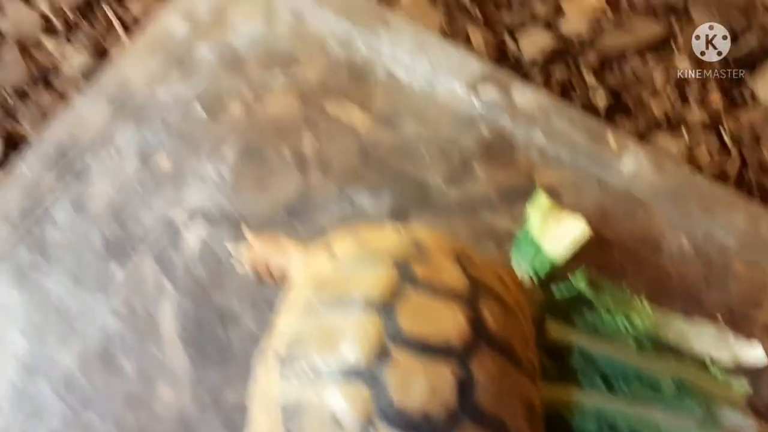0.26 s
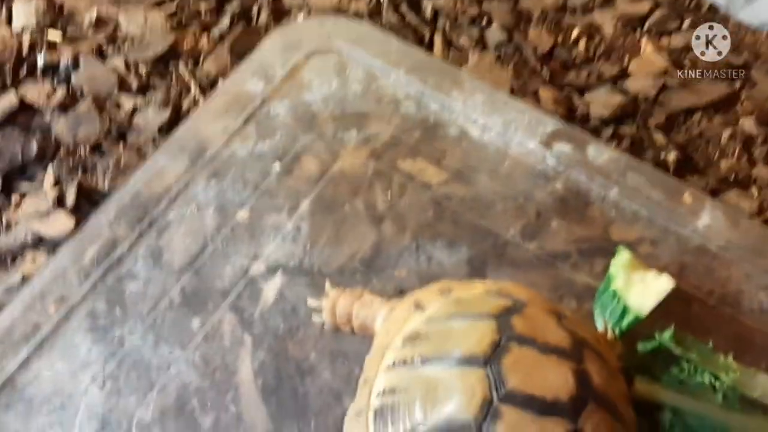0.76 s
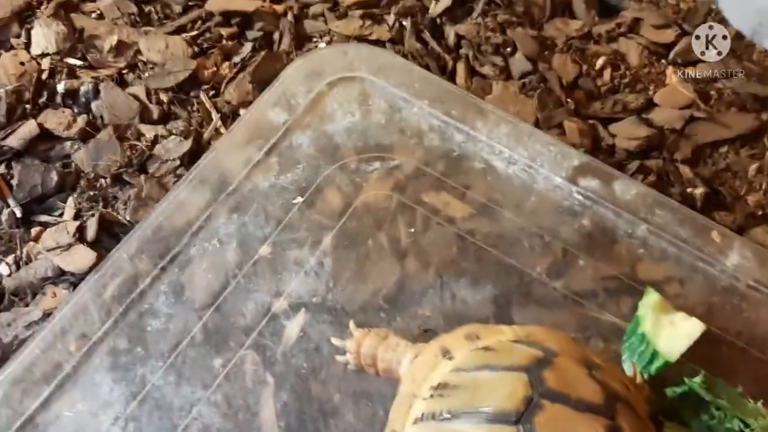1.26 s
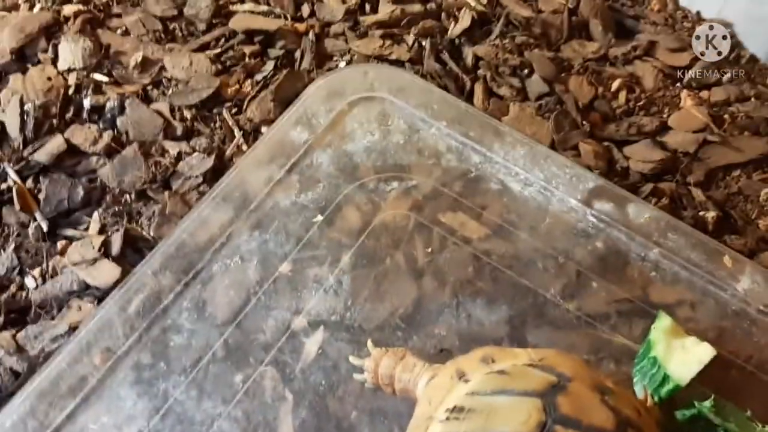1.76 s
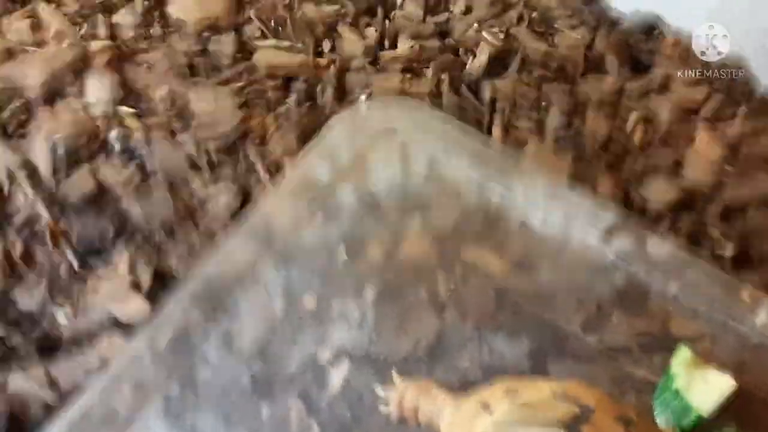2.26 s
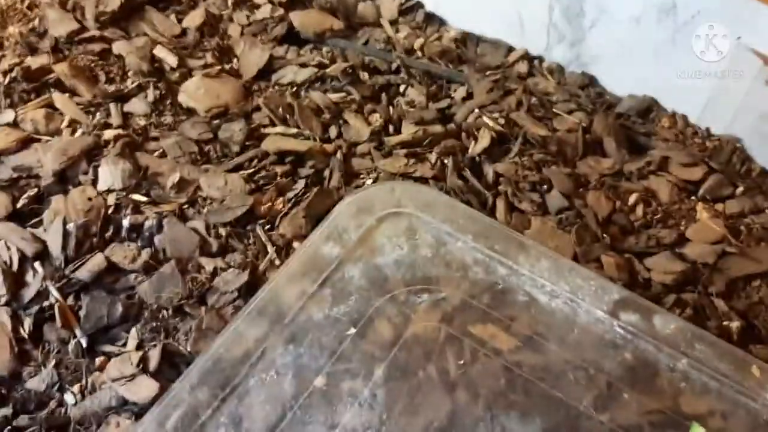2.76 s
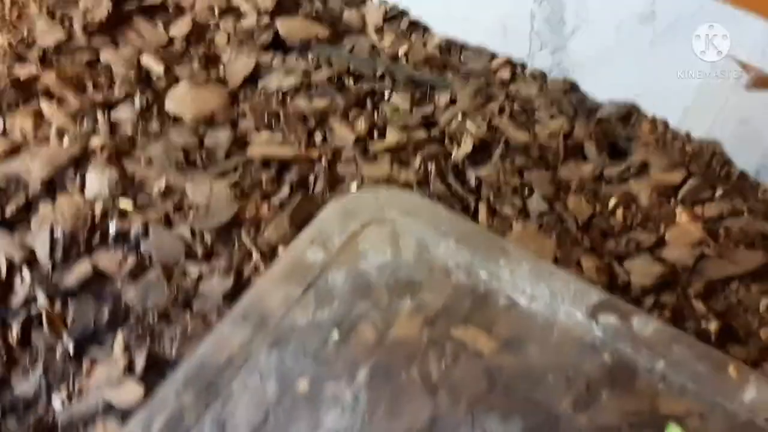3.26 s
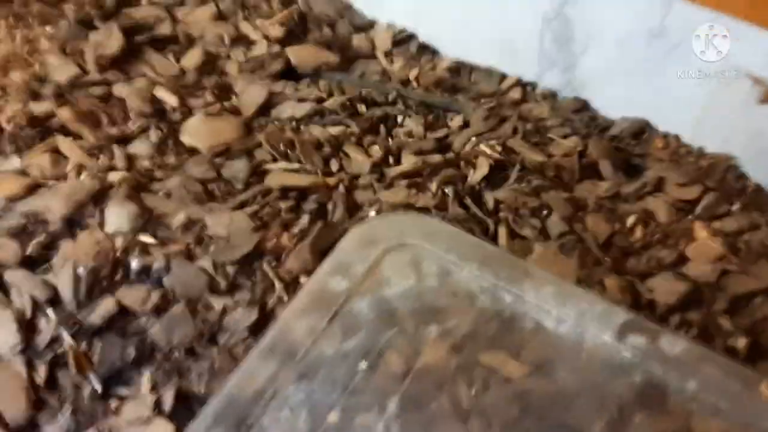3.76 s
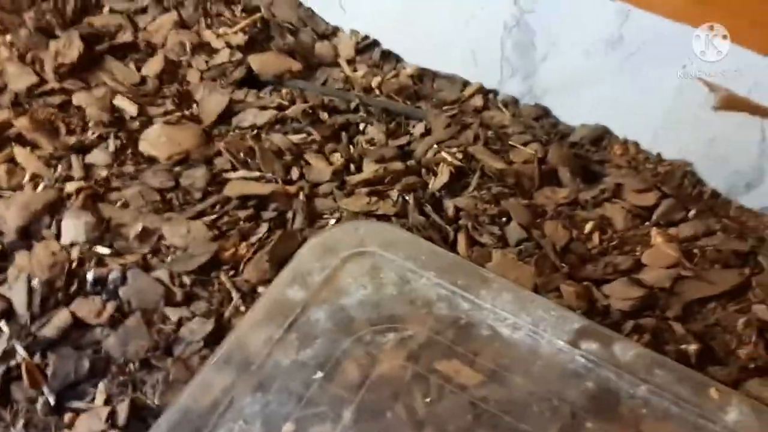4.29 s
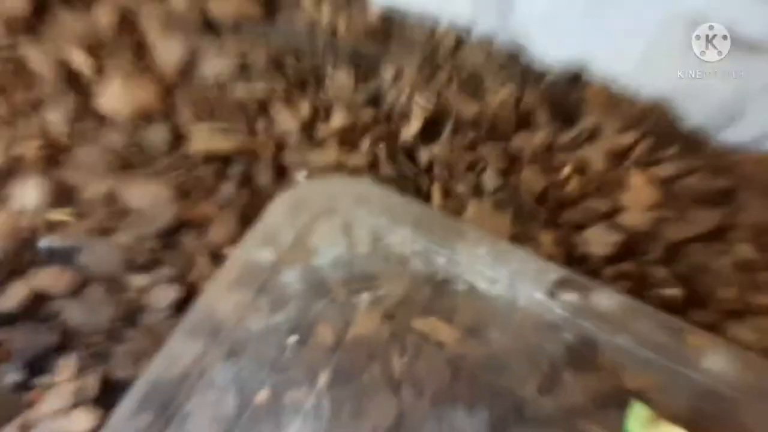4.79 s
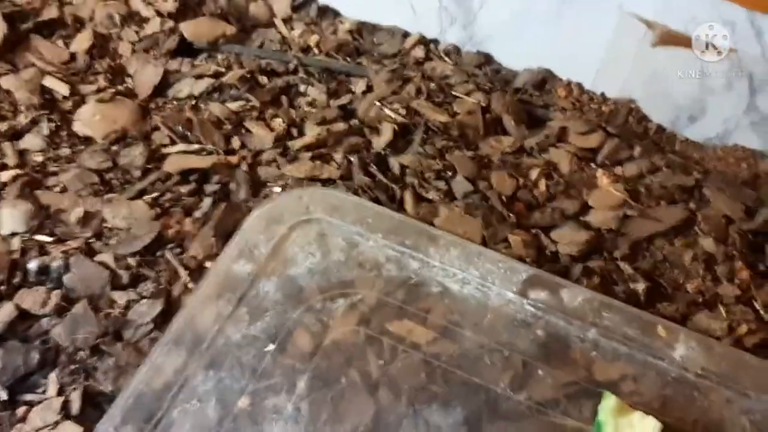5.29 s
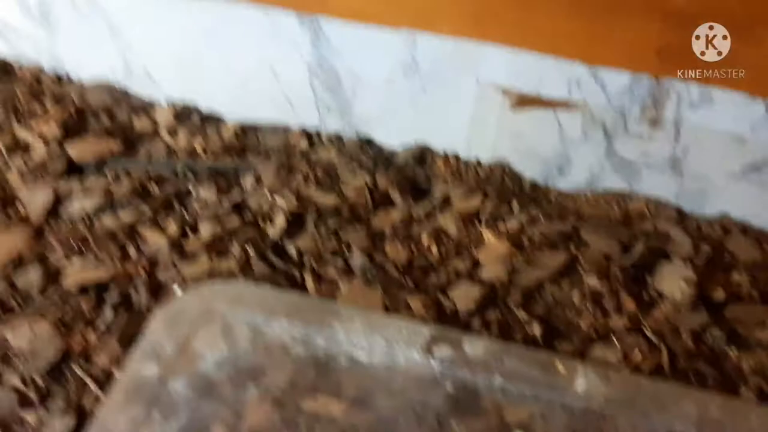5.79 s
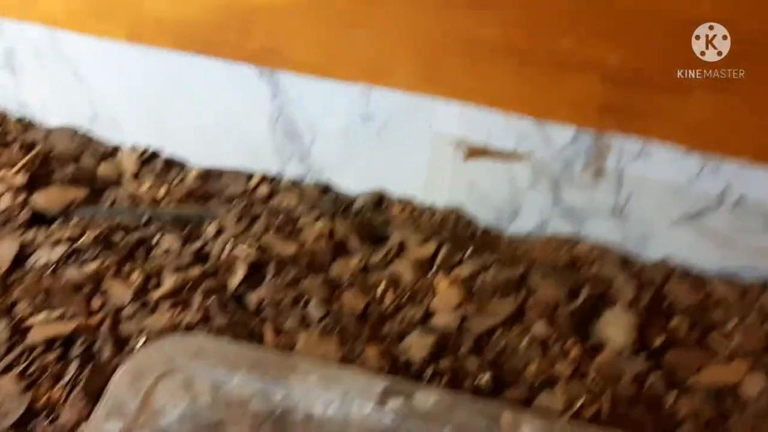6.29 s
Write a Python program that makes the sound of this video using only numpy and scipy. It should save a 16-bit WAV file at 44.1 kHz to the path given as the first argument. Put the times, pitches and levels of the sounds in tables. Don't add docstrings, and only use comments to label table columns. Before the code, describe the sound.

At 0.06 s a heavy, muffled bump bounces and rings low in plastic, with a thin drag and a far engine's low throb. The engine drops back at once, rises slightly around 0.9 s, slows, swells near 1.9 s and dies just after 2 s. Faint foot scuffs come at 0.9 and 1.2 s. At 1.47 s shell cracks on the hard tray with a quick bounce and a deep jolt of the held microphone. Small taps and dry scuffs follow from 2 to 3.6 s. Brighter double cracks snap at 3.85 s, light claw clicks at 4.13, the sharpest crack at 4.85, a duller, woodier one at 5.25. A short stuttering scrape runs 5.6-5.8 s, then faint taps and hiss to 6.5 s. Throughout: wavering low motor hum, soft floor thuds, quiet ventilation, a barely audible fan whine and short, close pen echoes.

```python
import sys
import numpy as np
from scipy import signal
from scipy.io import wavfile
from scipy.ndimage import uniform_filter1d

SR = 44100
rng = np.random.default_rng(int(sys.argv[2]) if len(sys.argv) > 2 else 0)


def volts_from_decibels(level):
    exponent = np.asarray(level, float) / 20
    return 10 ** exponent


def waveform_to_disk(signal):
    frames = np.transpose(np.atleast_2d(signal))
    scaled = np.clip(frames, -1, 1) * 32767
    samples = np.round(scaled).astype(np.int16)
    wavfile.write(sys.argv[1], SR, samples)


N = 288414

# t/s, tick/dB, thud/dB, knock/dB, fizz/dB
SHELL_CRACKS = [
    (1.468, -25, -27.5, -24.5, -16),
    (1.474, -26.5, -49, -36, -17),
    (1.505, -38, -47.5, -40.5, -44.5),
    (3.845, -17, -25.5, -24.5, -13),
    (3.856, -19, -26.5, -16, -18.5),
    (4.853, -14, -27.5, -20.5, -15.5),
    (4.861, -17.5, -30.5, -24.5, -14),
    (5.2476, -20.5, -34.5, -17, -32.5),
    (5.255, -28.5, -33, -20.5, -30.5),
]
# t/s, tick/dB, thud/dB, fizz over tick/dB, thud f/Hz
CLAW_TAPS = [(1.44, -60.5, -36.5, 9.5, 249), (1.619, -75.5, -90, 16, 440), (2.079, -54.5, -43.5, 0.1, 340),
             (2.347, -63.5, -48, 0, 350), (2.598, -78, -42, -3, 401), (2.61, -49.5, -36.5, 7, 358),
             (2.907, -61.5, -47, -0.5, 400), (3.755, -67, -58, 5, 420), (3.793, -71, -45.5, -18, 380),
             (4.123, -39.5, -41, -5, 320), (4.131, -38, -46, -5.5, 380), (5.218, -63.5, -73, -2.4, 400),
             (5.678, -53, -42.5, 4, 350), (5.819, -52.5, -43.5, -21.5, 410), (6.09, -78, -51, -3.5, 329.3)]
# t/s, tick/dB, thud/dB, thud f/Hz
FAR_BUMPS = [
    (0.058, -58.5, -32.5, 242),
    (0.071, -61.5, -38, 250),
    (0.089, -71, -32, 402),
]
# t/s, tick/dB, thud/dB, fizz over tick/dB, contact length/ms
FOOT_SCUFFS = [(.877, -63, -55.5, 6, 26), (.912, -64, -69, 8, 25), (1.153, -81, -83, 9, 31),
               (1.175, -66.5, -57.5, 9, 32), (2.056, -79.5, -79.5, 2, 30), (2.422, -75, -75, 12, 46),
               (2.74, -88.5, -77.5, 15.5, 18), (3.232, -65, -76, 2.5, 17), (3.266, -65.5, -56, 7, 39),
               (3.546, -81, -76.5, 7.5, 7.3), (6.389, -77.5, -67, 4, 24), (6.516, -83, -65, 2.3, 18)]
# f/Hz, t60/s, level/dB
TRAY_MODES = [(175.4, 0.26, 11), (258, 0.031, -1), (340, 0.031, 0), (384, 0.11, -0.5), (440, 0.093, -6),
              (580, 0.1, -2), (650, 0.18, -4)]
# low f/Hz, high f/Hz, t60/s
PEN_BANDS = [(2529, 4970, 0.068), (100, 800, 0.084), (1080, 2300, 0.048), (5800, 10500, 0.05),
             (10500, 14800, 0.037)]
# t/s, f/Hz, t60/s, level/dB
PLATE_RINGS = [(.058, 258, .14, -24.5), (.058, 175.4, 0.27, -33.5), (0.061, 440, 0.22, -37.5),
               (.062, 650, 0.25, -35), (.058, 1100, 0.092, -38.5), (.071, 266, 0.081, -26),
               (.2, 1540, 0.71, -67), (1.467, 1780, 0.029, -25.5), (1.468, 1120, .04, -30.5),
               (2.08, 334, 0.088, -32), (2.346, 344, 0.073, -45), (2.601, 436, 0.066, -35),
               (2.909, 400, .08, -39), (3.846, 796, 0.094, -26), (3.856, 1590, .04, -24),
               (.066, 778, .1, -35), (.88, 403, 0.097, -42), (4.852, 3017, 0.064, -17.5),
               (4.86, 3385, 0.076, -17.5), (4.862, 2980, 0.49, -55), (4.862, 5400, 0.18, -56),
               (5.254, 1300, 0.039, -17), (5.254, 1120, 0.026, -25.5), (5.818, 1174, 0.036, -37.5)]
# t/s, pressure/dB, place (0 middle, 1 rim)
SCRAPE_PATH = [
    (5.6, -59, 0.0088),
    (5.628, -64, .01),
    (5.64, -44.5, .1),
    (5.68, -47.5, .01),
    (5.696, -57, .3),
    (5.712, -47.5, 0.4),
    (5.752, -51.5, 0.89),
    (5.77, -51.5, 0.64),
    (5.8, -62, 0.27),
]
# f/Hz, width/Hz, level at middle/dB, level at rim/dB
SCRAPE_MODES = [(1195, 146, 2.5, -15), (1358, 66, -5, -5.5), (2280, 280, -14, -1.5), (4960, 270, -16, -18)]
# start t/s, loudest t/s, end t/s, loudest level/dB, fall to end/dB
SLOW_DRAGS = [
    (0.0, 0.067, .14, -62.5, -15),
    (.55, 0.737, .87, -73.5, -7),
    (1.629, 1.704, 1.85, -69.5, -13),
    (2.803, 2.835, 2.93, -60.5, -4),
    (3.497, 3.69, 3.75, -66.5, -8),
    (5.801, 5.823, 6.2, -70, -12),
]
# f/Hz, width/Hz, level/dB
DRAG_COLOURS = [
    [(5170, 4200, -1), (12060, 7500, 2)],
    [(7550, 1100, -15), (11400, 12000, -2)],
    [(7200, 2100, -4.5), (11510, 3500, -1)],
    [(6580, 190, -13), (11030, 450, -5), (10600, 8000, -7)],
    [(8120, 200, -10), (10400, 490, -9), (11000, 12000, 5)],
    [(5200, 190, -8), (7300, 670, -4), (11000, 12000, 8)],
]
# t/s, f/Hz, peak level/dB
HAND_JOLTS = [(.878, 89, -29.5), (1.176, 89.84, -31), (1.467, 74.6, -12), (2.079, 91.3, -35),
              (2.346, 95, -32), (2.909, 91, -32), (3.231, 90, -29.5), (3.844, 85.2, -17.5),
              (4.129, 89.8, -33), (4.853, 100, -28), (5.251, 95, -34), (5.676, 90, -37)]
# t/s, firing f/Hz, level/dB
ENGINE_RUN = [
    (0, 53, -29),
    (.05, 53.5, -29.5),
    (.2, 53.8, -40.5),
    (.9, 55.5, -44),
    (1.2, 55.2, -41),
    (1.5, 50.16, -40),
    (1.7, 47.44, -40),
    (1.88, 45.5, -34),
    (2.15, 46.4, -53.5),
]
# t/s, level/dB
HUM_LEVEL = [(0.0, -41.5), (1.0, -43), (1.05, -55), (1.24, -39), (1.69, -44.5), (3.01, -42.5), (3.15, -62),
             (3.2, -43), (6.54, -48)]
# t/s, f/Hz, peak level/dB
SOFT_THUDS = [(0.721, 84, -40), (.93, 76, -40), (3.01, 50, -31.5), (3.229, 84, -36), (3.409, 50, -41.5),
              (4.15, 49, -39.5), (4.419, 80, -38), (3.549, 48, -40.5), (3.86, 48, -33.5),
              (4.629, 52, -39.5), (4.9, 78, -35.5), (5.099, 48, -40.5), (5.751, 50, -39), (6.1, 52, -44.5),
              (6.499, 52, -45)]
# f/Hz, width/Hz, level/dB
ROOM_MODES = [(48, 15, -48), (67.5, 16, -55.5), (86, 8.7, -50), (100, 18, -56.5), (160, 27, -59),
              (228, 89, -66), (305.2, 41, -66.5), (463, 110, -69), (612.4, 43, -69), (989, 160, -69),
              (1360, 610, -73), (2220, 1600, -84.5)]
# t/s, level/dB
VENT_SWELL = [(0, -64), (.45, -68), (1.64, -69), (1.9, -70), (3.8, -68.5), (4.2, -72.5), (5.7, -69.5),
              (5.9, -69.5), (6.54, -68)]
# f/Hz, width/Hz, level/dB
PORT_PEAKS = [(837, 140, -10.5), (5760, 400, -3.5), (7910, 820, 5), (12400, 2800, 3.5)]


def unit(x):
    return x / np.sqrt(np.mean(x ** 2))


def curve(table, outside=None):
    t_s, *columns = np.transpose(table)
    return [np.interp(np.arange(N) / SR, t_s, c, left=outside, right=outside) for c in columns]


def resonance(x, hz, width_hz):
    return signal.lfilter(*signal.iirpeak(hz, hz / width_hz, SR), x)


def band(x, low_hz, high_hz):
    return signal.sosfilt(signal.butter(3, [low_hz, high_hz], "band", fs=SR, output="sos"), x)


def walk(rate_hz):
    hold = int(SR / rate_hz)
    steps = np.repeat(rng.standard_normal(N // hold + 1), hold)
    return 1.3 * uniform_filter1d(uniform_filter1d(steps, hold), hold)[:N]


def grit(scatter_db, channels=1, size=N):
    noise = rng.standard_normal((channels, size))
    return unit(noise * volts_from_decibels(scatter_db * rng.exponential(size=(channels, size))))


def contacts():
    sounds = []
    for s, *levels_db in SHELL_CRACKS:
        sounds.append((s, contact(levels_db, 1.4, 350, 1.3, 3.2, -22.5)))
    for s, tick, thud, sharp, hz in CLAW_TAPS:
        knock = tick + 1 - 0.44 * sharp
        sounds.append((s, contact([tick, thud, knock, tick + sharp], 1.2, hz, 2.1, 4.2, -17.5)))
    for s, tick, thud, hz in FAR_BUMPS:
        levels_db = [tick - 5, thud - 3, tick + 10, tick - 3.0]
        sounds.append((s, contact(levels_db, 5.0, hz, 0.88, 2.4, -7.5)))
    for s, tick, thud, sharp, length_ms in FOOT_SCUFFS:
        levels_db = [tick + .54, thud + 5.3, tick + 0.55, tick + sharp + .4]
        sounds.append((s, contact(levels_db, length_ms, 380, 1.04, 4.0, -7)))

    out = np.zeros((2, N + SR))
    for s, sound in sounds:
        start = int(s * SR)
        out[:, start:start + sound.shape[1]] += sound
    return out[:, :N]


def contact(levels_db, length_ms, thud_hz, taper, direct, late_db, late_t60_s=.2):
    t = np.arange(SR // 5) / SR
    n = SR // 20
    burst = grit(3.0, size=n) * np.clip(1 - t[:n] * 1000 / max(length_ms, .2), 0, 1) ** taper
    walls = grit(1.8, channels=2, size=len(t))
    walls[:, 0] = direct
    late = volts_from_decibels(late_db) * 1000 ** (-t / late_t60_s)

    tick_db, thud_db, knock_db, fizz_db = levels_db
    top_db = fizz_db - 3 + 0.6 * min(fizz_db - tick_db - 4.0, 0)
    bands_db = [tick_db, thud_db, knock_db, fizz_db - 3, top_db]
    head_n = int(max(length_ms, 12) * SR / 1000)
    out = 0
    for k, (db, (low_hz, high_hz, t60_s)) in enumerate(zip(bands_db, PEN_BANDS)):
        echoes = walls * (1000 ** (-t / t60_s) + late)
        sound = band(signal.fftconvolve(burst, echoes, axes=1)[:, :len(t)], low_hz, high_hz)
        if k == 1:
            sound = tray_thud(sound, thud_hz)
        head = sound[:, :head_n]
        out = out + volts_from_decibels(db) * sound / np.sqrt(np.mean(head ** 2, axis=1, keepdims=True))
    return out


def tray_thud(blow, thud_hz):
    out = 0
    for hz, t60_s, db in TRAY_MODES:
        off_pitch_db = -16 * np.log2(hz / thud_hz) ** 2
        out = out + volts_from_decibels(db + off_pitch_db) * unit(resonance(blow, hz, 3.4 / t60_s))
    return out


def plate_rings():
    out, t, beat = np.zeros(N + SR), np.arange(SR // 2) / SR, walk(40)
    for s, hz, t60_s, db in PLATE_RINGS:
        span = slice(int(s * SR), int(s * SR) + len(t))
        out[span] += volts_from_decibels(db + 2.5 * beat[span]) * np.sin(2 * np.pi * hz * t) * 1000 ** (-t / t60_s)
    return out[:N]


def shell_scrape():
    span = slice(int(5.55 * SR), int(5.85 * SR))
    pressure_db, place = [column[span] for column in curve(SCRAPE_PATH)]
    touching = curve(SCRAPE_PATH, outside=0)[0][span] < 0

    def share(middle_db, rim_db):
        return volts_from_decibels(pressure_db + middle_db + place * (rim_db - middle_db))

    slips = grit(2.2, channels=2, size=len(place)) * volts_from_decibels(2.0 * walk(150)[span])
    body = 0
    for hz, width_hz, middle_db, rim_db in SCRAPE_MODES:
        mode = resonance(resonance(slips, hz, width_hz), hz, 3 * width_hz)
        body = body + share(middle_db, rim_db) * volts_from_decibels(3.0) * unit(mode)
    rumble = share(-3, -0.5) * unit(band(slips, 272, 690))
    rasp = volts_from_decibels(0.5) * unit(band(slips, 6500, 16000)) + volts_from_decibels(1.5) * unit(band(slips, 1100, 4800))
    out = np.zeros((2, N))
    out[:, span] = (body + rumble + share(-15.5, -13) * rasp) * touching
    return out


def drags():
    rise_db_per_s, tail_s = 53, .03
    out = np.zeros((2, N))
    for (start, loud, end, top_db, fall_db), modes in zip(SLOW_DRAGS, DRAG_COLOURS):
        span = slice(int(max(start, 0) * SR), int((end + tail_s) * SR))
        level_db = curve([(start, top_db - rise_db_per_s * (loud - start)),
                          (loud, top_db),
                          (end, top_db + fall_db),
                          (end + tail_s, top_db + fall_db - 15)])[0]
        rub = grit(2.5, channels=2, size=span.stop - span.start)
        colour = 0
        for hz, width_hz, db in modes:
            patchy = volts_from_decibels(db + 2.2 * walk(27.07)[span])
            colour = colour + patchy * unit(resonance(rub, hz, width_hz))
        out[:, span] += volts_from_decibels(level_db[span] + 1.3 * walk(60)[span]) * unit(band(colour, 3000, 17000))
    return out


def jolts(t60_s=0.029):
    out, t = np.zeros((2, N)), np.arange(SR // 8) / SR
    for s, hz, db in HAND_JOLTS:
        start = int(s * SR)
        swing = np.sin(2 * np.pi * hz * t) * 1000 ** (-t / t60_s)
        out[1, start:start + len(t)] += volts_from_decibels(db + 5.5) * swing
    return out


def engine():
    hz, level_db = curve(ENGINE_RUN)
    fade_db = -30 * np.clip(np.arange(N) / SR - ENGINE_RUN[-1][0], 0, None)
    phase = 2 * np.pi * np.cumsum(hz + .6 * walk(15)) / SR
    return np.sqrt(2) * volts_from_decibels(level_db + fade_db + 1.8 * walk(18)) * np.sin(phase)


def hum():
    hum_hz, beat_hz, beat_s, beat_length_s, beat_db = 80, 7.1, 2.68, 0.49, -43.5
    t = np.arange(N) / SR - beat_s
    phase = 2 * np.pi * np.cumsum(hum_hz + 1.2 * walk(12)) / SR
    first = volts_from_decibels(curve(HUM_LEVEL)[0] + 2.2 * walk(17)) * np.sin(phase)
    second = volts_from_decibels(beat_db) * np.exp(-(t / beat_length_s) ** 2) * np.sin(phase + 2 * np.pi * beat_hz * t)
    return np.sqrt(2) * (first + second)


def floor_thuds(length_s=0.056):
    out = np.zeros(N)
    for s, hz, db in SOFT_THUDS:
        t = np.arange(N) / SR - s
        out += volts_from_decibels(db) * np.exp(-(t / length_s) ** 2) * np.sin(2 * np.pi * hz * t)
    return out


def ventilation(hiss_db=-76):
    swell_db = curve(VENT_SWELL)[0]
    swell_db = swell_db - swell_db.mean()
    out = volts_from_decibels(hiss_db) * rng.standard_normal((2, N))
    for hz, width_hz, db in ROOM_MODES:
        noise = rng.standard_normal((2, N))
        mid, side = unit(resonance(resonance(noise, hz, 1.3 * width_hz), hz, 1.3 * width_hz))
        spread = min(hz / 400., 1)
        out = out + volts_from_decibels(db + swell_db + 1.4 * walk(6.4)) * (mid + spread * side * np.array([[1], [-1]]))
    return out


def fan_whine():
    whine_hz, level_db, swing_db, period_s, peak_s = 2560, -89.5, 5.5, 1.05, 2.6
    swing = np.cos(2 * np.pi * (np.arange(N) / SR - peak_s) / period_s)
    phase = 2 * np.pi * np.cumsum(whine_hz + 4 * walk(5.8)) / SR
    return volts_from_decibels(level_db + swing_db * swing + 1.5 * walk(3.5)) * np.sin(phase)


def scene():
    tortoise = contacts() + plate_rings() + shell_scrape() + drags() + jolts()
    return tortoise + engine() + hum() + floor_thuds() + ventilation() + fan_whine()


def top_cut(x):
    return signal.sosfilt(signal.butter(12, 16370, fs=SR, output="sos"), x)


def record(dry):
    for hz, width_hz, db in PORT_PEAKS:
        dry = dry + (volts_from_decibels(db) - 1) * resonance(dry, hz, width_hz)
    treble_cut = signal.ellip(8, .2, 40, 15600, fs=SR, output="sos")
    mix = signal.sosfilt(treble_cut, np.clip(dry, -1, 1))
    return top_cut(np.clip(mix, -1, 1))


dry = scene()
out = record(dry)
waveform_to_disk(out)
```